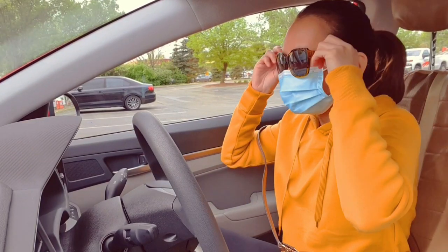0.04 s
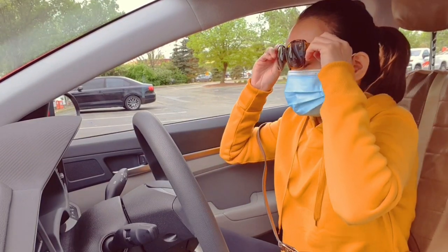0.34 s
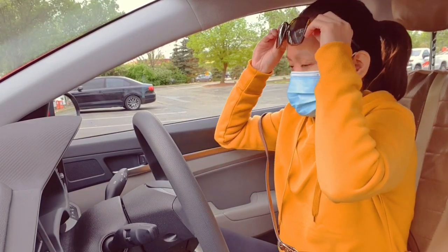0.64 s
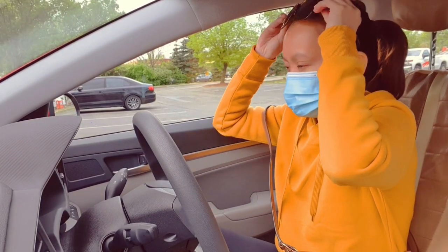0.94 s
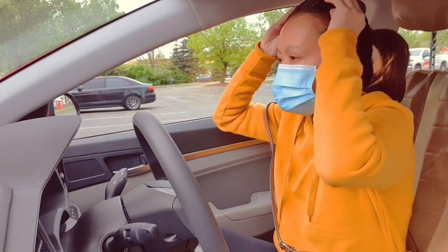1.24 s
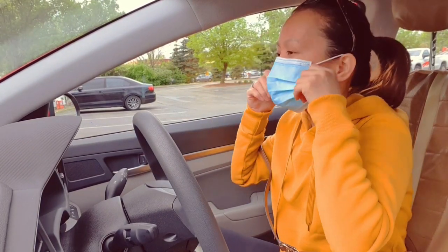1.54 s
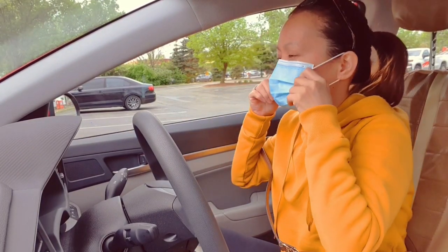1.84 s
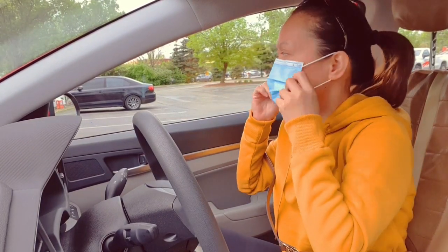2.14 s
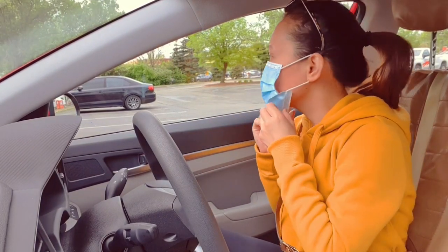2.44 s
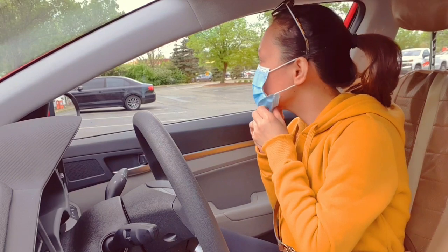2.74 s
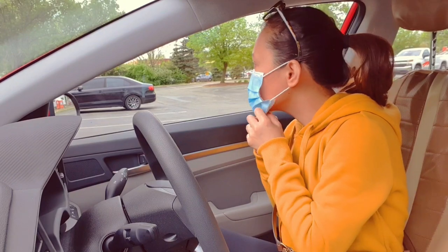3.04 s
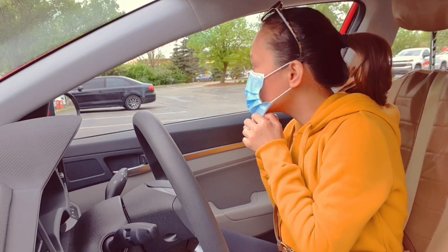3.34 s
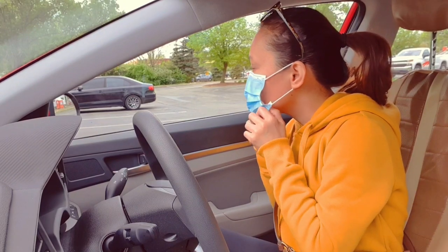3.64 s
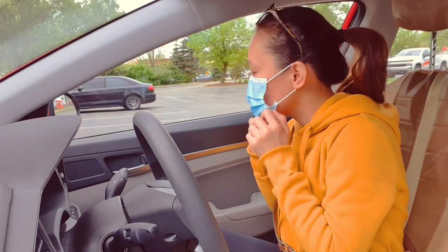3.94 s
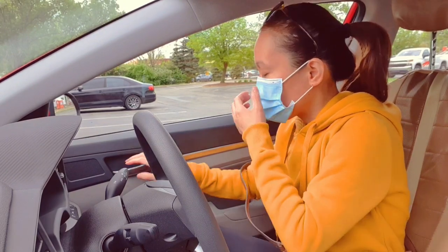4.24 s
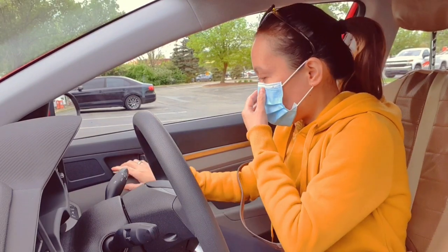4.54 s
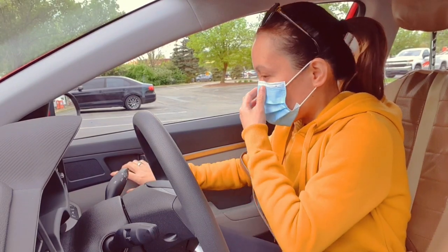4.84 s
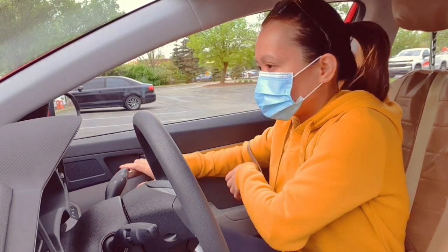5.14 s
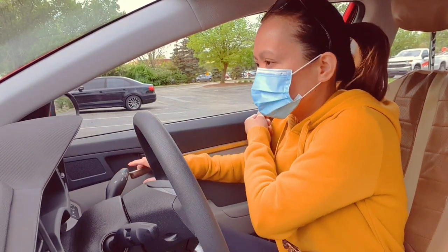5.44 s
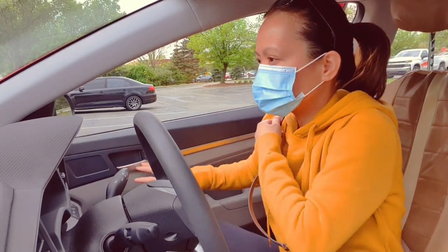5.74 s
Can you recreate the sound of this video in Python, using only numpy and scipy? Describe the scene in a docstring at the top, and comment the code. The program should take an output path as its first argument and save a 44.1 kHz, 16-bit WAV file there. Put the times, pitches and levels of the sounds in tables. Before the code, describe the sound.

Heard from the dashboard of a parked car, small close sounds sit over a steady low rumble: a few light clicks of sunglasses, a faint scrape through hair, then papery rustles and finger taps on a face mask. A sleeve brushes the door panel, the door latch lets go with a loud clunk that booms through the cabin, and the handle snaps back against its stop.

```python
"""A low rumble fills a parked car. Sunglasses are pushed up: the frame clicks, the arms scrape through hair.
Fingers rub and tap a face mask while adjusting it. Near 5 s a sleeve drags along the door trim and
the handle is pulled; the latch lets go with a clunk that rings the door panel and makes the cabin boom.
At 5.7 s the sprung handle knocks back against its stop."""
import sys
import numpy as np
from scipy import signal
from scipy.fft import rfft, irfft
from scipy.io import wavfile

SR = 44100
rng = np.random.default_rng(int(sys.argv[2]) if len(sys.argv) > 2 else 0)


def waveform_to_disk(signal):
    """Save audio, clipped to [-1, 1], as 16-bit WAV at the path in sys.argv[1]."""
    frames = np.transpose(np.atleast_2d(signal))
    scaled = np.clip(frames, -1, 1) * 32767
    samples = np.round(scaled).astype(np.int16)
    wavfile.write(sys.argv[1], SR, samples)


N = 255339
TIME_S = np.arange(N) / SR

# stereo balance of the cabin: freq_hz, left_minus_right_db
BALANCE = [(100, 1.37), (250, 2.5), (500, 4.5), (1100, 2), (2600, 4.5), (5500, 7), (8000, 1.5),
           (14000, -0.5)]


def amp(db):
    """Decibels to gain."""
    return 10 ** (np.asarray(db) / 20)


def at_hz(points, hz):
    """Interpolates a curve over log frequency."""
    points_hz, values = np.transpose(points)
    return np.interp(np.log(hz + 1), np.log(points_hz + 1), values)


def add(mix, start_s, sound):
    """Mixes in a stereo sound."""
    part = mix[:, max(round(start_s * SR), 0):][:, :sound.shape[1]]
    part += sound[:, :part.shape[1]]


def cabin_field(pair, spectrum, ripple_db):
    """Two independent signals to unit-rms stereo: bass alike in both ears, treble combed by the windows."""
    # likeness of left and right: freq_hz, correlation
    likeness = [(100, .99), (300, 0.74), (600, 0.5), (1200, 0), (2400, .25), (4400, 0), (15000, 0)]
    hz = np.fft.rfftfreq(pair.shape[1], 1 / SR)
    a, b = rfft(pair)
    correlation = np.clip(at_hz(likeness, hz), -1, 1)
    lean = amp(at_hz(BALANCE, hz) / 2)
    field = np.array([a * lean, (correlation * a + np.sqrt(1 - correlation ** 2) * b) / lean])
    comb = np.interp(hz / 70, np.arange(1024), rng.standard_normal(1024)) * (1 - correlation)  # 70 Hz grid
    out = irfft(field * amp(at_hz(spectrum, hz) + ripple_db * comb), pair.shape[1])
    return out / np.sqrt(np.mean(out ** 2) + 1e-20)


def noise(spectrum, size=N, ripple_db=4.0):
    """Steady shaped noise in the cabin."""
    return cabin_field(rng.standard_normal((2, size)), spectrum, ripple_db)


def friction(spectrum, slips_per_s, spread_db, tail_t60_s):
    """Many tiny uneven slips, each smeared by the cabin's short ring."""
    slips = (rng.random(N) < slips_per_s / SR) * amp(spread_db * np.minimum(rng.exponential(1, N), 4))
    power = signal.lfilter([1], [1, -np.exp(-np.log(1e6) / (tail_t60_s * SR))], slips ** 2)
    grain = np.sqrt(power) * rng.standard_normal((2, N))
    return cabin_field(grain, spectrum, ripple_db=2.8)  # the moving hand blurs the reflections


def stroke(middle_s, level_db, length_s, steepness=5.06):
    """Power of one hand stroke: swell, hold, fade."""
    return amp(level_db) ** 2 / (1 + np.abs(2 * (TIME_S - middle_s) / length_s) ** steepness)


def push(start_s, length_s, level_db, catch_s=0.018, ease_db_per_s=15.5, release_db_per_s=132):
    """Gain of one push: catches, eases as the glasses slip, dies once the hands stop."""
    t = np.maximum(TIME_S - start_s, 0)
    fall_db = ease_db_per_s * t + release_db_per_s * np.maximum(t - length_s, 0)
    return np.minimum(t / catch_s, 1) * amp(level_db - fall_db)


def burst(spectrum, t60_s, rise_s, direct_gain, direct_s=0.0049, size=16384):
    """One contact: direct crack, then dense cabin reflections."""
    t = np.arange(size) / SR
    decay = amp(-60 * t / t60_s) + direct_gain * np.exp(-t / direct_s)
    return noise(spectrum, size) * (1 - np.exp(-t / rise_s)) * decay


def tick(centre_hz, width_oct, t60_s):
    """Light contact with one resonance."""
    hz = np.geomspace(50, SR / 2, 90)
    hump_db = -20 * np.log10(1 + (np.log2(hz / centre_hz) / width_oct) ** 2)
    return burst(np.c_[hz, hump_db], t60_s, rise_s=0.0007, direct_gain=0.3)


def strike(blows, modes, build_s):
    """Force pulses ring a panel; longer contacts leave out the higher modes."""
    t = np.arange(SR) / SR
    ring, out = np.zeros((2, SR)), np.zeros((2, N))
    for hz, level_db, t60_s in modes:
        lean_db = at_hz(BALANCE, hz) * np.array([[0.5], [-0.5]])
        ring += amp(level_db + lean_db - 60 * t / t60_s) * np.sin(2 * np.pi * hz * t)
    ring *= np.exp(-t / build_s) - 1  # the swing starts outward and builds up
    for start_s, force_db, contact_s, _ in blows:
        pulse = np.sin(np.pi * t[t < contact_s] / contact_s) ** 2
        add(out, start_s, amp(force_db) * signal.fftconvolve(ring, pulse[None] / pulse.sum(), axes=1))
    return out


def background(rumble_db=-39, hiss_db=-72.5):
    """Low rumble in the closed cabin, with a faint hiss."""
    # noise spectra: freq_hz, relative_db
    rumble = [(12, -33.5), (28, -14), (40, 1.5), (54, -3), (70, -4), (100, -3.5), (128, -17), (185, -14),
              (265, -24), (476, -29), (654, -39), (827, -38.5), (1100, -61), (1600, -90.5)]
    hiss = [(500, -33.5), (1100, 2.5), (2100, 0.5), (3500, -7.5), (4700, -11.5), (5800, -9), (6700, -0.5),
            (7400, -14), (11000, -9.5), (15500, -16.5)]
    return amp(rumble_db) * noise(rumble) + amp(hiss_db) * noise(hiss, ripple_db=3.3)


def finger_taps():
    """Fingers touch mask, trim and handle."""
    # contacts: start_s, level_db, centre_hz, width_oct, t60_s
    taps = [(1.534, -51, 745, 0.55, 0.15), (1.627, -57.5, 2800, 0.49, 0.48),
            (1.728, -52.5, 3500, 0.53, 0.13), (2.79, -57.5, 2670, 0.54, 0.085),
            (4.256, -54.5, 1100, 0.3, 0.22), (4.458, -47.5, 5450, 0.56, 0.078),
            (4.622, -64.5, 6200, .37, 0.12), (4.963, -52, 5610, 1.4, 0.11), (5.065, -43, 796, 0.075, 0.064),
            (5.2229, -44.5, 2400, 0.43, 0.07), (5.5202, -46, 2070, 0.59, 0.085),
            (5.655, -46, 2140, 0.27, 0.22)]
    out = np.zeros((2, N))
    for start_s, level_db, centre_hz, width_oct, t60_s in taps:
        add(out, start_s, amp(level_db) * tick(centre_hz, width_oct, t60_s))
    return out


def glasses():
    """The frame clicks; its arms scrape through hair, ringing in a narrow band, then rustle as they settle."""
    # pushes through hair: start_s, length_s, level_db
    pushes = [(0.07, 0.027, -63.5), (0.279, 0.48, -59)]
    # settling pats: middle_s, level_db, length_s
    pats = [(1.084, -67, 0.081), (1.259, -67, 0.13)]
    # scrape and rustle spectra: freq_hz, relative_db
    scrape = [(1000, -18), (1900, -13.5), (2350, -0.5), (2700, 1), (3200, -15), (4500, -17.5), (9000, -30)]
    rustle = [(1400, -10.5), (2100, -1.5), (2600, -3), (3100, -17), (4500, -2.5), (5400, -8),
              (12000, -21.5)]
    # frame clicks: start_s, ring_db, ring_hz, snap_db
    clicks = [(.038, -42.5, 2660, -57.5), (0.2298, -40.5, 2420, -73), (.377, -44, 2660, -57)]
    out = friction(scrape, slips_per_s=510, spread_db=2.5, tail_t60_s=0.18)
    out *= sum(push(*row) for row in pushes)
    out += np.sqrt(sum(stroke(*row) for row in pats)) * noise(rustle)
    for start_s, ring_db, ring_hz, snap_db in clicks:
        ring = amp(ring_db) * tick(ring_hz, width_oct=0.14, t60_s=0.088)
        snap = amp(snap_db) * tick(centre_hz=5600, width_oct=0.3, t60_s=0.13)
        add(out, start_s, ring + snap)
    return out


def cloth(gain_db=1.82, split_hz=7200, waver_db=0.8, waver_s=0.035, rasp_hz=2350, rasp_width_hz=130):
    """Fibres slip under wavering finger pressure; the stiff mask is crisper than the sweatshirt."""
    # strokes over hair, mask and cloth: middle_s, relative_db, length_s, treble_db
    rubs = [(.76, -71, 0.37, 1), (1.245, -71, 0.063, 6), (1.735, -62.5, 0.19, -3),
            (2.192, -52.5, 0.043, -4), (2.242, -61.5, 0.049, 1.5), (2.716, -66.5, 0.23, 0.5),
            (2.93, -57, 0.085, -4.5), (3.122, -56.5, 0.093, 1), (3.222, -57, 0.06, 2.5),
            (3.428, -64, 0.47, 5), (3.576, -56, 0.051, 1.5), (3.726, -58.5, 0.23, 1),
            (3.869, -55.5, .034, 3), (3.952, -59.5, 0.042, 8), (4.456, -69, 0.17, 1), (5.22, -58, 0.1, -5),
            (5.58, -57.5, 0.47, -0.5), (5.684, -52, .026, -21)]
    # rubbing spectrum: freq_hz, relative_db
    spectrum = [(400, -6), (1200, -6.5), (2050, -4.5), (2380, -1), (2650, -6), (2900, 1), (4300, -2),
                (5800, -4), (6750, -0.5), (7300, -6.5), (11400, -10), (15300, -23)]
    grain = friction(spectrum, slips_per_s=900, spread_db=0.5, tail_t60_s=0.057)
    grain *= amp(waver_db * np.interp(TIME_S / waver_s, np.arange(1024), rng.standard_normal(1024)))
    treble = signal.sosfiltfilt(signal.butter(4, split_hz, "high", fs=SR, output="sos"), grain)
    papery_peak = signal.iirpeak(rasp_hz, rasp_hz / rasp_width_hz, fs=SR)
    rasp = amp(-4) * signal.lfilter(*papery_peak, grain.mean(0))
    body = grain - treble + rasp
    body_power = sum(stroke(s, db, length_s) for s, db, length_s, _ in rubs)
    treble_power = sum(stroke(s, db + treble_db, length_s) for s, db, length_s, treble_db in rubs)
    return amp(gain_db) * (np.sqrt(body_power) * body + np.sqrt(treble_power) * treble)


def sleeve():
    """The arm drags along the hollow door trim."""
    # drags: middle_s, level_db, length_s
    drags = [(5.093, -40.5, .04), (5.208, -37.5, 0.036), (5.51, -38.5, .18), (5.706, -35, 0.1)]
    # sleeve on trim: freq_hz, relative_db
    spectrum = [(80, 13.5), (190, 9), (450, 1.5), (650, -5.5), (850, -7), (1200, -10.5), (2200, -19),
                (4000, -34), (8000, -49)]
    envelope = np.sqrt(sum(stroke(*row) for row in drags))
    return envelope * friction(spectrum, slips_per_s=480, spread_db=5.5, tail_t60_s=0.17)


def handle():
    """The sprung handle falls back: a hollow knock with a plastic snap."""
    # hitting the stop, then settling: start_s, force_db, contact_s, snap_db
    blows = [(5.7005, 3.5, 0.0017, -29.5), (5.7201, -10.5, 0.00065, -52)]
    # handle and trim modes: pitch_hz, level_db, t60_s
    modes = [(86.5, -23.5, 0.18), (186.2, -16, 0.15), (322, -21, 0.1), (390, 11, 0.026), (448.7, 9, 0.031),
             (488.5, -5.5, 0.055), (838, -6.5, 0.027)]
    # plastic snap: freq_hz, relative_db
    plastic = [(400, -3), (900, 7.5), (1400, 0.5), (2100, -3.5), (2650, -7.5), (3330, 9), (4050, -9),
               (4600, -3), (5300, -20), (6900, -12), (8000, -23), (15000, -36)]
    out = strike(blows, modes, build_s=0.013)
    for start_s, _, _, snap_db in blows:
        snap = burst(plastic, t60_s=0.078, rise_s=0.00064, direct_gain=1.04, direct_s=0.003)
        add(out, start_s, amp(snap_db) * snap)
    return out


def latch():
    """The pawl slips and the seal throws the door out: the panel booms, the latch metal rattles."""
    # slack taken up, then release: start_s, force_db, contact_s, rattle_db
    blows = [(5.118, -28, 0.0016, -48), (5.221, -24, 0.005, -44), (5.3558, 3.5, 0.003, -36.5),
             (5.3642, -23.5, 0.0016, -26.5), (5.3714, -5, .0015, -26), (5.3816, -11, 0.0035, -26),
             (5.3926, -10, 0.0027, -39), (5.405, -9, 0.0028, -32), (5.4382, -23, 0.0021, -32.5)]
    # door panel and cabin air modes: pitch_hz, level_db, t60_s
    modes = [(43.16, -18, 1), (72, -9.5, 0.59), (80.2, -3, 0.14), (94.4, -8, 0.57), (121.4, -16, 0.28),
             (172.3, 10.5, 0.028), (192.5, -24.5, 0.42), (277, -12, 0.086), (367, -12.5, 0.13),
             (430, -16, 0.13), (483, 0, 0.03), (529, 9.5, 0.04), (857, -19.5, 0.14), (985, -6.5, 0.071)]
    # ring of the latch metal: freq_hz, relative_db
    metal = [(250, 2.5), (600, -3.5), (865, -2), (1100, -12.5), (1270, -6.5), (1650, -11), (2300, -15),
             (3400, -19.5), (6500, -29), (8400, -33), (9150, -27), (9800, -36.5), (15300, -39)]
    out = strike(blows, modes, build_s=0.0095)
    for start_s, _, _, rattle_db in blows:
        add(out, start_s, amp(rattle_db) * burst(metal, t60_s=0.13, rise_s=0.0014, direct_gain=1.0))
    return out


def scene():
    """All sources, heard from the dashboard."""
    return background() + glasses() + cloth() + sleeve() + finger_taps() + latch() + handle()


def record(dry, cutoff_hz=15480):
    """Soft limit near full scale, then low-pass."""
    limited = dry / (1 + dry ** 8) ** (1 / 8)
    lowpass = signal.firwin(511, cutoff_hz, window=("kaiser", 9), fs=SR)
    return signal.oaconvolve(limited, lowpass[None], "same")


dry = scene()
out = record(dry)
waveform_to_disk(out)
```